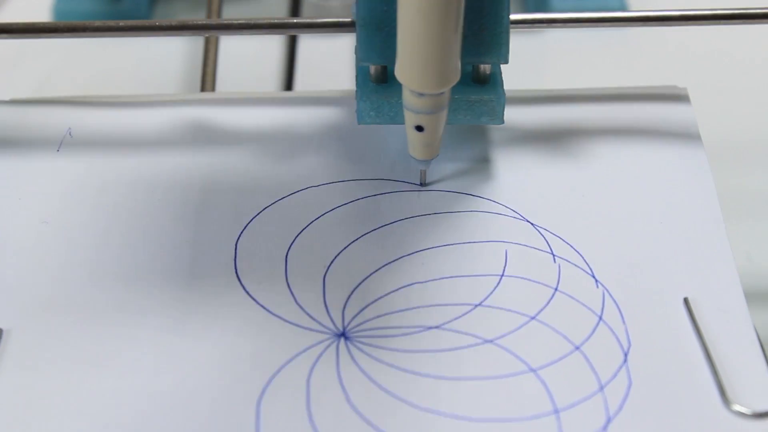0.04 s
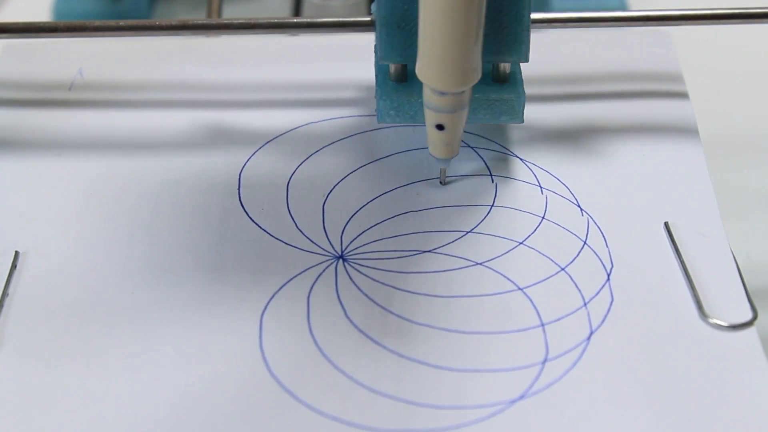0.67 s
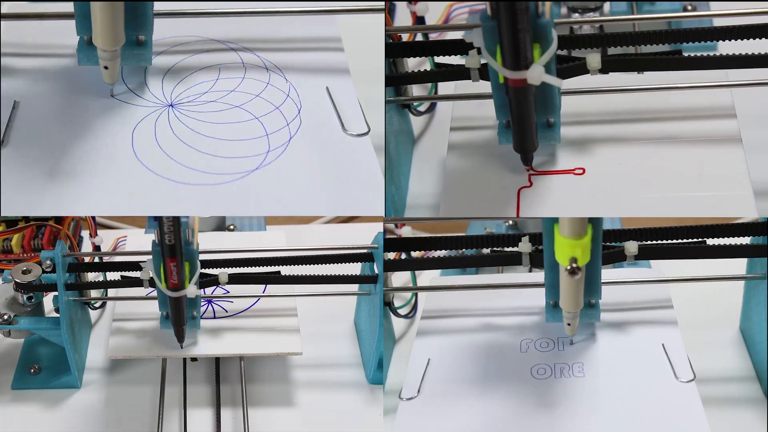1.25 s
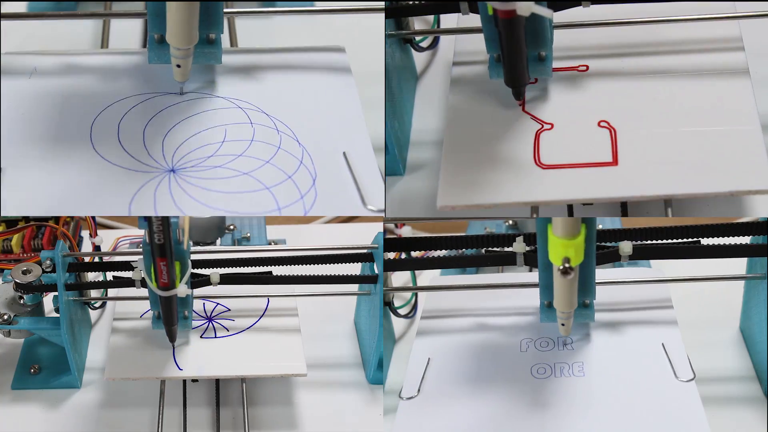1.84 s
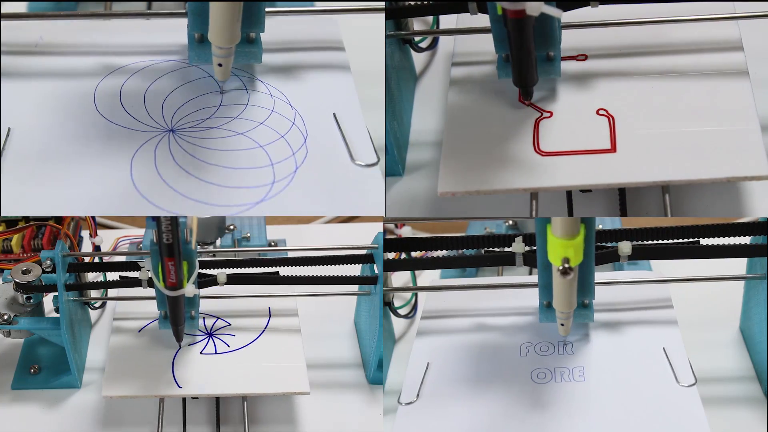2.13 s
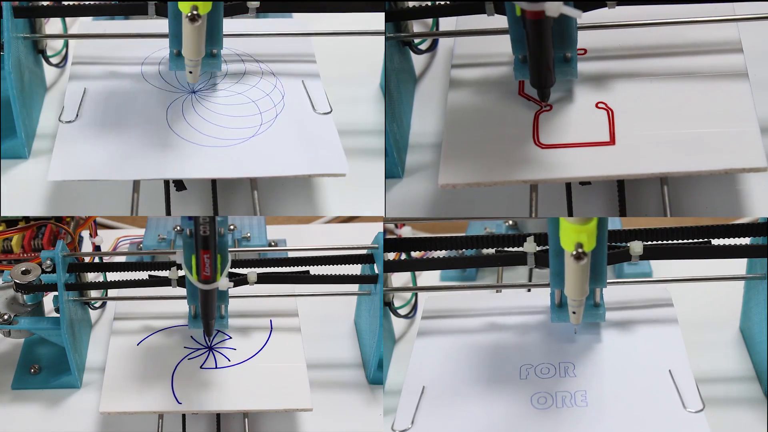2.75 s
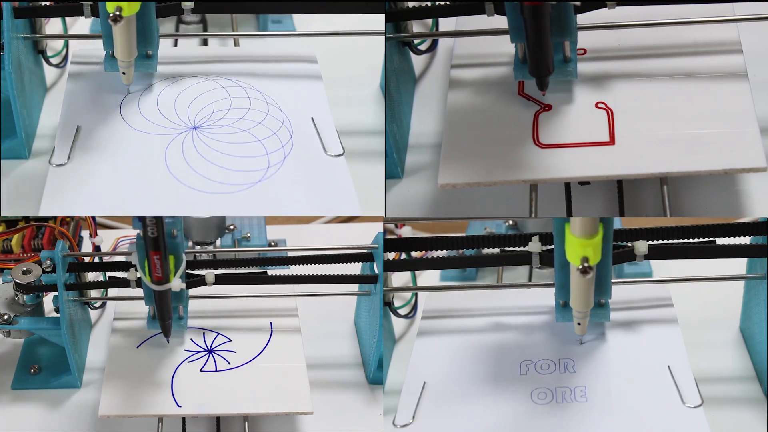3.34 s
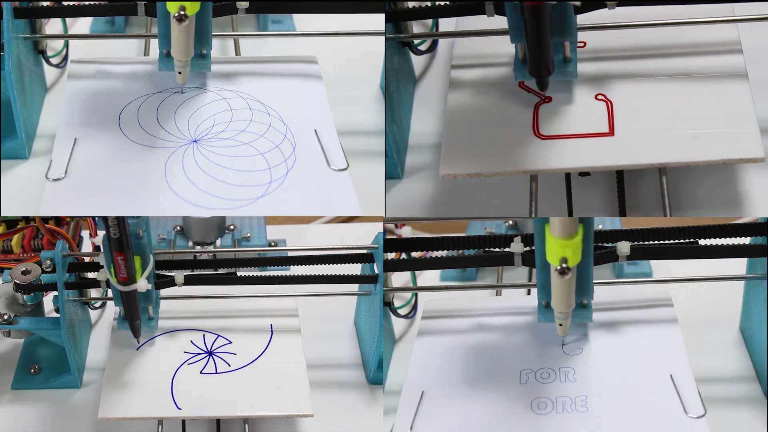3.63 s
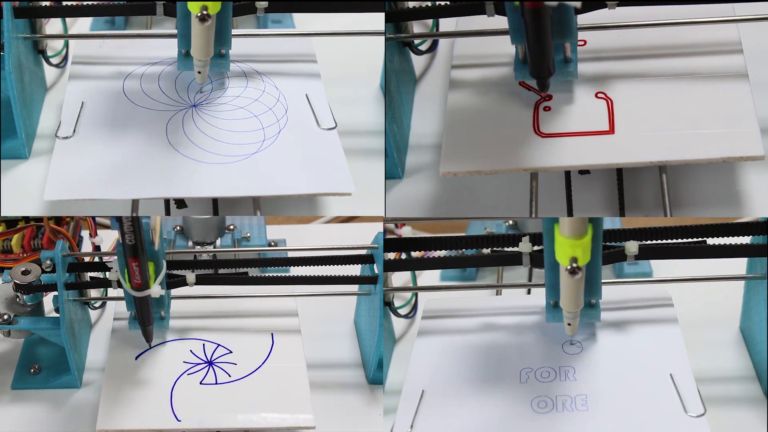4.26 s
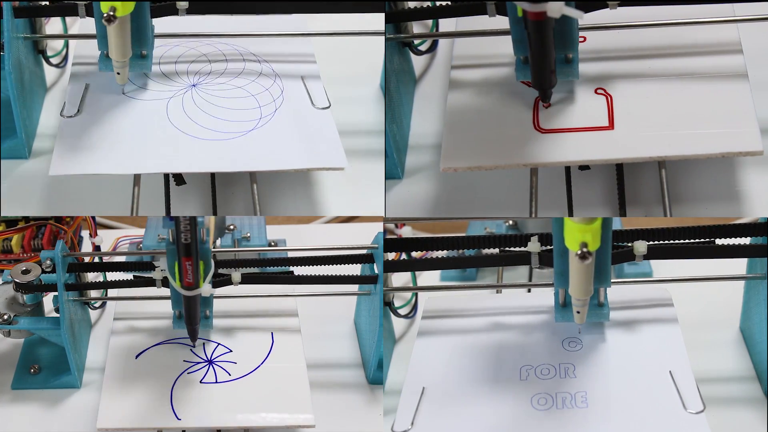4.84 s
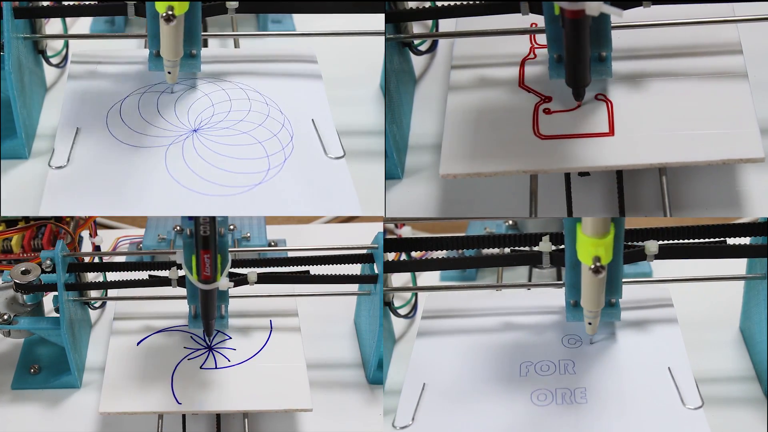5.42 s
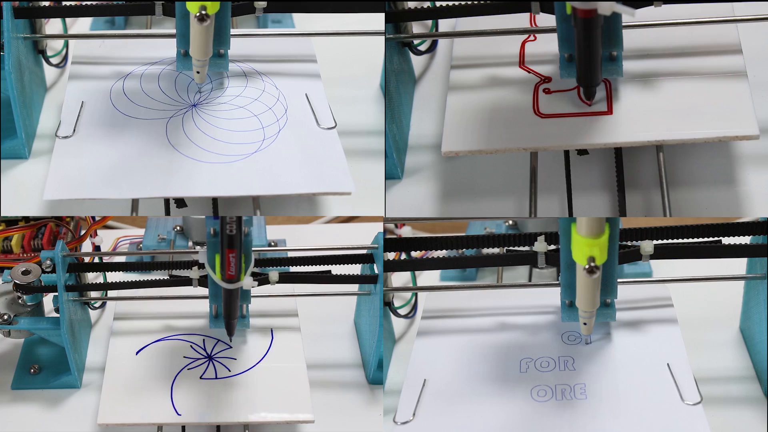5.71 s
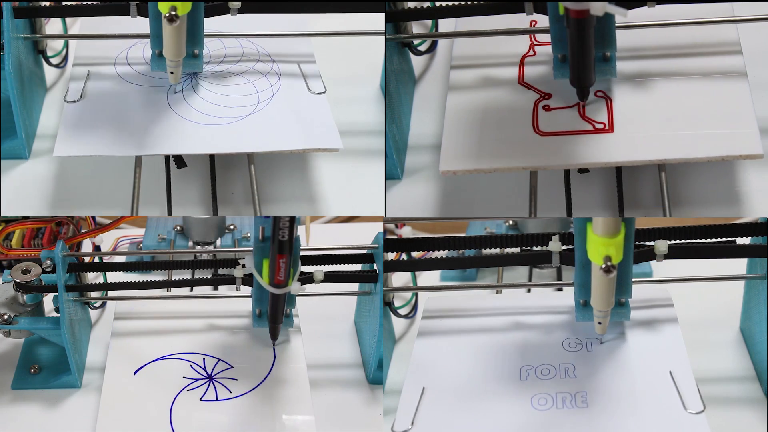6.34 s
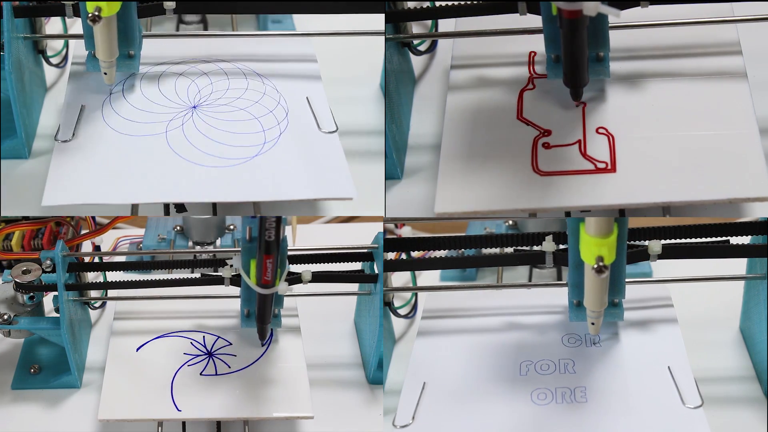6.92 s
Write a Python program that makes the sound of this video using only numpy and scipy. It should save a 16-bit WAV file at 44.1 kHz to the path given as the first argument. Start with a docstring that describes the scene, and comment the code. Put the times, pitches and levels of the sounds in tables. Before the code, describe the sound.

A small pen plotter's stepper motors whine close by, the pitch sweeping smoothly up and down over a soft rubbing hiss. After about a second, three more plotters join in with short, stuttering whines, and the sound grows busier. Loose bearings chatter and rasp on metal rods throughout, with scattered ticks and a few light knocks from pen lifts. The machines stand on a desk in a small room.

```python
"""A desk, close up: four small pen plotters. One draws a rosette of circles; after a second three
writers join it in short strokes. Steppers whine through the frames at multiples of the step rate,
rising and falling with axis speed. Loose bearings chatter and rasp on the rods, slides and pens rub,
the drives hum, and a pen lift knocks now and then."""
import sys
import numpy as np
from scipy import signal
from scipy.fft import rfft, irfft, next_fast_len
from scipy.io import wavfile
from scipy.ndimage import uniform_filter1d

SR = 44100
rng = np.random.default_rng(int(sys.argv[2]) if len(sys.argv) > 2 else 0)


def master(y):
    """Save y as 16-bit WAV."""
    cut = np.clip(np.atleast_2d(y).T, -1, 1)
    pcm = np.round(cut * 32767)  # scale
    wavfile.write(sys.argv[1], SR, pcm.astype(np.int16))


N = 307818
T = np.arange(N) / SR

TURN_S, DRAW_FROM_S, DRAW_TO_S = 1.355, -.724, .715  # from, to: relative to mid-circle
DRAW_STEP_HZ, SMOOTH_STEP_HZ = 519.5, 480
CIRCLER_RAMP_HZ_PER_S, WRITER_RAMP_HZ_PER_S = 6000, 4600
JOIN_S = .982  # writers start

# Table levels are relative. Order = multiple of the step rate.
# Circle midpoints: t/s
CIRCLES = [-0.279, 1.530, 3.326, 5.117, 6.917]
# Pen hops between circles: t/s from next midpoint, duration/s, peak step rate/Hz, level/dB
HOPS = [(-.98, .035, 490, -5), (-.957, .02, 490, -4), (-.9, .03, 490, -4), (-.86, .024, 490, 2),
        (-.834, .036, 480, -1)]
# Circler whine per axis, and its squeal: order, level/dB
BED_ORDERS = [(1, -13), (2, -13), (4, .3), (8, -2), (16, -.7)]
CARRIAGE_ORDERS = [(1, -11), (2, -12), (4, -11), (8, -7), (16, -12)]
SQUEAL_ORDERS = [(20, 0), (24, -5), (28, -3), (32, -6)]
# High resonances of the circler frame and the steel rods: f/Hz, width/Hz, level/dB
SQUEAL_MODES = [(8330, 1000, 0), (12300, 1500, -4.5)]
ROD_MODES = [(4200, 420, -2), (8350, 600, -8.5), (12100, 1000, -11)]
# Frame radiation: f/Hz, level/dB
CIRCLER_FRAME = [(150, -50), (330, -33), (450, -16), (560, -14), (680, -24), (1000, -19), (1330, -17),
                 (1550, -8), (1850, -1.5), (2050, 1), (2600, -2), (3050, -15), (3600, -17), (4200, -9),
                 (4900, -18), (6600, -16), (7500, -4), (8300, 3.5), (9300, -10), (11000, -19)]
WRITER_FRAME = [(100, -40), (230, -9), (320, -16), (520, -9), (700, -6), (890, 2.5), (1010, .5),
                (1300, -3.5), (2000, 1), (3000, -4), (4150, 5), (5200, -6), (8300, 0), (13000, -9)]
# Slide and pen friction spectra: f/Hz, level/dB
CIRCLER_RUB = [(30, -44), (150, -38), (310, -34), (450, -18), (540, -17), (620, -21), (1000, -12),
               (1550, -3), (1850, 2), (2200, -2), (3500, -4), (4300, 0), (6000, -7), (16000, -12)]
WRITER_RUB = [(30, -38), (100, -33), (170, -29), (205, -12), (255, -6.5), (320, -16), (540, -5.5),
              (740, -4), (900, 2), (1150, -2), (2200, 0), (3100, -4.5), (6000, -5), (15500, -12)]
# Drive hum: f/Hz, circler level/dB, writer level/dB
HUM = [(500.3, -79, -64), (1000, -64, -74), (2000, -72, -80)]
# Circler sleeve rattles, every lap: peak t/s from midpoint, swell/s, level/dB
LAP_RATTLES = [(-.811, .012, -45), (-.678, .012, -43), (-.546, .06, -47), (-.422, .04, -40),
               (-.225, .03, -44), (.245, .055, -42), (.428, .003, -42), (.452, .02, -42), (.62, .02, -47),
               (.68, .015, -38), (.726, .004, -46)]
# Hard rattles, mostly the writers', a few (2.43 s, 6.03 s) from the circler's bearings: peak t/s, swell/s,
# sleeve level/dB, rod level/dB
HARD_RATTLES = [(1.172, .008, -45, -48), (1.203, .012, -46, -46), (1.255, .009, -42, -44),
                (1.306, .031, -42, -41), (1.414, .025, -46, -46), (1.513, .014, -39, -35.5),
                (1.879, .026, -42, -38), (1.99, .05, -42, -38), (2.145, .004, -39, -39),
                (2.28, .035, -47, -46), (2.432, .012, -41, -52), (2.585, .017, -43, -47),
                (2.833, .006, -34.5, -44), (2.93, .014, -41, -42), (3.14, .015, -41, -50),
                (3.27, .015, -41, -50), (3.482, .03, -42, -45), (3.805, .02, -41, -39),
                (3.998, .035, -39, -39), (4.263, .014, -39, -46), (4.313, .028, -46, -41),
                (4.475, .056, -43, -46), (4.575, .06, -45, -44), (4.663, .019, -45, -41),
                (5.042, .018, -41, -45), (5.16, .02, -46, -48), (5.597, .03, -46, -42),
                (5.939, .003, -43, -42), (6.026, .004, -44, -50), (6.066, .012, -40, -50),
                (6.114, .03, -42, -42), (6.484, .028, -42, -40), (6.686, .02, -39, -38),
                (6.775, .03, -42, -51)]
# Belt and bearing slack ticks: t/s, level/dB
TICKS = [(.1456, -31), (.718, -36), (1.857, -29), (1.9235, -31), (2.1425, -25), (2.828, -23.5),
         (3.3608, -23.5), (3.8028, -28), (5.418, -23), (5.4903, -26), (6.2362, -30)]
# Response of struck sleeves and rods: f/Hz, level/dB
CIRCLER_SLEEVE = [(300, -35), (2000, -15), (4200, -10), (6500, -11), (8300, 6), (9100, 0), (10200, -8),
                  (11700, 0), (12900, 0), (13800, -14), (16000, -17)]
WRITER_SLEEVE = [(300, -35), (1000, -13), (2000, -14), (3000, -12), (5000, -11), (6000, -6), (7000, -9),
                 (8300, 4.5), (9100, -2), (10200, -9), (12100, -.5), (13000, -3), (14000, -5), (16000, -9)]
ROD_RESPONSE = [(300, -35), (1000, -12), (3000, -9), (3600, -2), (4150, 9), (4900, -5), (6000, 2.5),
                (7000, -10), (8600, 2), (10300, -11), (12600, -4), (14600, 6.5), (16000, -9)]
# Writer whine, and the overtone that rings the rods: order, level/dB
WRITER_ORDERS = [(1, -9), (2, 0), (4, -10), (16, -15)]
ROD_ORDER = [(8, -1)]
# Curved strokes: mid t/s, duration/s, peak step rate/Hz, level/dB
STROKES = [(1.06, .06, 490, 2), (1.225, .16, 490, 2), (1.29, .1, 590, -2), (1.454, .19, 650, 0),
           (1.47, .16, 490, -3), (1.655, .2, 530, -4), (1.82, .16, 520, -2), (1.833, .16, 650, 1),
           (1.95, .14, 590, -1), (2.53, .08, 500, 0), (2.62, .15, 580, -2), (2.68, .19, 510, 1.5),
           (2.73, .2, 510, -3), (2.81, .11, 520, -3), (3.48, .08, 500, -1), (3.565, .1, 500, -2),
           (3.68, .3, 522, -1.5), (3.885, .09, 450, -1), (4.12, .05, 500, 2), (4.16, .06, 500, 2.5),
           (4.442, .18, 459, 0), (5.506, .14, 470, 2.5), (5.75, .1, 480, -1), (5.992, .24, 522, -1),
           (6.4, .15, 505, 1.5)]
# Lines: start t/s, stop t/s, max step rate/Hz, run-up level/dB, braking level/dB, 4th-order boost/dB
LINES = [(1.14, 1.39, 640, -9, -2, 0), (2.95, 3.14, 260, 5, 8, -4), (3.34, 3.585, 600, -9, -1, -3),
         (3.43, 3.67, 530, -16, -5, 14), (3.78, 4.085, 700, -9, 0, 0), (4.48, 4.775, 680, -14, -7, 16),
         (4.785, 5.13, 660, -5, -3, 13), (5.22, 5.448, 520, -18, -7, 20), (5.32, 5.695, 800, -3, -7, -6),
         (5.465, 5.79, 650, -10, -10, 11), (5.785, 6.195, 930, -6, -5, -6), (6.31, 6.575, 620, -12, -2, 8),
         (6.485, 6.775, 620, -4, -3, 7)]
# Bearing drag: mid t/s, duration/s, level/dB
RASPS = [(1.2, .09, -44), (1.42, .07, -42), (1.81, .06, -45), (2.54, .12, -46), (2.68, .16, -46),
         (3.11, .06, -47), (3.46, .12, -47), (3.58, .07, -44), (4.38, .06, -47), (4.51, .14, -46),
         (5.03, .07, -46), (5.16, .07, -43), (5.52, .22, -47.5), (5.91, .06, -46), (6.04, .04, -44),
         (6.61, .14, -45)]
# Pen-lift and frame knocks: t/s, f/Hz, level/dB, decay/s
KNOCKS = [(2.875, 1900, -41, .02), (2.894, 1900, -40, .014), (2.935, 2800, -38, .006),
          (3.375, 480, -52, .022), (4.657, 680, -47, .012), (6.308, 250, -48, .02),
          (6.738, 950, -38.5, .012), (6.728, 650, -44, .018), (6.781, 480, -44, .009),
          (6.827, 560, -44, .01)]
# Side-channel response of the room scatter: f/Hz, level/dB
SIDE_RESPONSE = [(60, 7), (170, 3), (330, 2), (700, -6), (1400, -9), (3000, -11), (10000, -12),
                 (15000, -10)]


def undb(db):
    """dB to gain."""
    return 10 ** (np.asarray(db) / 20)


def unit(x):
    """Scale to rms 1."""
    return x / np.sqrt(np.mean(x ** 2) + 1e-20)


def colour(x, points):
    """Minimum-phase filter through points of f/Hz, level/dB."""
    size = next_fast_len(N + 8192, real=True) // 2 * 2
    hz, db = np.transpose(points)
    bins_hz = np.arange(size // 2 + 1) * SR / size
    gain = undb(np.interp(np.log(bins_hz + 1), np.log(hz), db))
    cepstrum = irfft(np.log(gain))
    cepstrum[1:size // 2] *= 2
    cepstrum[size // 2 + 1:] = 0
    return irfft(rfft(x, size) * np.exp(rfft(cepstrum)))[:N]


def ring(x, hz, width_hz, stages=1):
    """Cascade of equal resonators, gain 1 at centre."""
    for _ in range(stages):
        x = signal.lfilter(*signal.iirpeak(hz, hz / width_hz, fs=SR), x)
    return x


def decay(x, decay_s):
    """Exponential tail on each impulse."""
    return signal.lfilter([1], [1, -np.exp(-1 / (decay_s * SR))], x)


def walk(rate_hz):
    """Smooth random drift, spread near 1."""
    hop = max(int(SR / rate_hz), 1)
    points = 1.15 * rng.standard_normal(N // hop + 2)
    ease = .5 - .5 * np.cos(np.pi * np.arange(hop) / hop)
    return (points[:-1, None] + np.diff(points)[:, None] * ease).ravel()[:N]


def lap():
    """Time from the nearest circle midpoint, and pen speed as a step rate: ramp, hold, brake."""
    since_s = T - np.array(CIRCLES)[np.argmin(abs(T[:, None] - CIRCLES), axis=1)]
    edge_s = np.minimum(since_s - DRAW_FROM_S, DRAW_TO_S - since_s)
    return since_s, np.clip(edge_s * CIRCLER_RAMP_HZ_PER_S, 0, DRAW_STEP_HZ)


def moves(rows):
    """Step rate and gain of an axis: one arch of speed per move."""
    step_hz, gain = np.zeros((2, N))
    for mid_s, length_s, peak_hz, db in rows:
        i = np.arange(max(int((mid_s - length_s / 2) * SR), 0), min(int((mid_s + length_s / 2) * SR), N))
        arch = np.maximum(np.cos(np.pi * (T[i] - mid_s) / length_s), 0)
        step_hz[i], gain[i] = peak_hz * arch, undb(db) * np.sqrt(arch)
    return step_hz, gain


def stepper(step_hz, orders, jitter, flutter):
    """Rotor snaps pole to pole; speed jitters, overtones flutter with load. Near silent when slow."""
    steps = np.cumsum(step_hz * (1 + jitter * walk(250))) / SR
    phase = 2 * np.pi * (steps % 1)
    whine = sum(undb(db) * (1 + flutter * walk(70)) * np.sin(order * phase) for order, db in orders)
    return whine * np.minimum(step_hz / 320, 1) ** 1.5


def circling_motors():
    """Bed and carriage run at the cosine and sine of the heading; the pen hops between circles."""
    since_s, feed_hz = lap()
    heading = 2 * np.pi * since_s / TURN_S
    bed_hz, carriage_hz = feed_hz * abs(np.cos(heading)), feed_hz * abs(np.sin(heading))
    bed = stepper(bed_hz, BED_ORDERS, jitter=.003, flutter=.17)
    # the belt carries more whine pulling than pushing
    bed -= .2 * np.cos(heading) * ring(bed, 2100, 1900)
    carriage = stepper(carriage_hz, CARRIAGE_ORDERS, jitter=.008, flutter=.35)
    hop_hz, gain = moves([(mid_s + offset_s, *hop) for mid_s in CIRCLES for offset_s, *hop in HOPS])
    hops = gain * stepper(hop_hz, BED_ORDERS[:4], jitter=.04, flutter=.4)
    whine = undb(-44.5) * colour(bed + carriage + hops, CIRCLER_FRAME)
    return whine + undb(-44.5) * squeal(bed_hz) + undb(-55) * squeal(carriage_hz)


def squeal(step_hz):
    """Below cruising speed the rotor shudders; its upper orders sweep the high frame modes."""
    shudder = np.clip((SMOOTH_STEP_HZ - step_hz) / 55, 0, 1)
    upper = shudder * stepper(step_hz, SQUEAL_ORDERS, jitter=.011, flutter=.45)
    return sum(undb(db) * ring(upper, hz, width_hz, stages=2) for hz, width_hz, db in SQUEAL_MODES)


def impacts(rate_hz, scatter_db, decay_s, unevenness, contact_samples=14):
    """A loose part strikes near-periodically, each strike a gritty crack."""
    chance = rng.standard_normal((int(8 * rate_hz), 2))
    periods_s = np.exp(unevenness * chance[:, 0]) / rate_hz
    onsets = (np.cumsum(periods_s) * SR).astype(int)
    hits = np.bincount(onsets, undb(scatter_db * chance[:, 1]), N)[:N]
    envelope = decay(uniform_filter1d(hits, size=contact_samples), decay_s)
    return unit(envelope * rng.standard_normal(N))


def rubbing(joined):
    """Rolling balls and pen tips make grit that rings the rods; the writer frames growl."""
    _, feed_hz = lap()
    load = undb(-6.5 + 1.2 * feed_hz / DRAW_STEP_HZ + 5.5 * joined + 1.3 * walk(30))
    circler = unit(colour(rng.standard_normal(N) * undb(walk(20)), CIRCLER_RUB))
    grains = impacts(rate_hz=900, scatter_db=3, decay_s=.0006, unevenness=.3)
    grit = unit(grains + .9 * rng.standard_normal(N))
    rods = unit(sum(undb(db + 2.2 * walk(45)) * ring(grit, hz, 1.5 * width_hz, stages=2)
                    for hz, width_hz, db in ROD_MODES))
    roughness = impacts(rate_hz=1100, scatter_db=2.5, decay_s=.001, unevenness=.3)
    growl = unit(colour(roughness, WRITER_RUB))
    return undb(-46.5) * circler + load * (undb(-49) * rods + undb(-44) * joined * growl)


def hum(joined):
    """Pulsed drive current sings at steady pitches."""
    out = np.zeros(N)
    for hz, circler_db, writer_db in HUM:
        gain = undb(circler_db) + joined * undb(writer_db + 2 * walk(12))
        wobble_rad = (.25 + .15 * joined) * walk(14)
        out += gain * np.sin(2 * np.pi * hz * T + wobble_rad)
    return out


def bursts(rows, release_s=.008):
    """Rattle force: soft onset, swell, abrupt end."""
    force = np.zeros(N)
    for peak_s, swell_s, db in rows:
        corners_s = peak_s + np.array([-swell_s - .002, -swell_s, 0, release_s, release_s + .004])
        i = slice(*np.searchsorted(T, corners_s[[0, -1]]))
        force[i] += undb(db + np.interp(T[i], corners_s, [-25, -11, 0, -11, -35]))
    return force


def chatter(joined, faint_per_s=9):
    """Bearing sleeves sizzle and buzz in bursts; hard rattles hammer the rods; ticks ring both."""
    sizzle = lap()[1] / DRAW_STEP_HZ * undb(-62 + 4 * walk(40))
    lap_force = sizzle + bursts([(mid_s + offset_s, swell_s, db)
                                 for mid_s in CIRCLES for offset_s, swell_s, db in LAP_RATTLES])
    faint_force = joined * bursts([((k + late) / faint_per_s, .016, -53 + 3 * strength)
                                   for k, (late, strength) in enumerate(rng.random((80, 2)))])
    sleeve_force = bursts([(peak_s, swell_s, db) for peak_s, swell_s, db, _ in HARD_RATTLES])
    rod_force = bursts([(peak_s, swell_s, db) for peak_s, swell_s, _, db in HARD_RATTLES])
    rod_force = np.hypot(undb(-1.5) * faint_force, rod_force)
    ticks = slack_ticks()
    buzz = impacts(rate_hz=640, scatter_db=2, decay_s=.0008, unevenness=.25)
    hammer = impacts(rate_hz=430, scatter_db=1.2, decay_s=.00025, unevenness=.08, contact_samples=32)
    rattle = faint_force * buzz + .6 * sleeve_force * (buzz + hammer)
    sleeves = colour(undb(8.3) * rattle + undb(-3) * ticks, WRITER_SLEEVE)
    rods = colour(undb(8.6) * rod_force * hammer + undb(1.5) * ticks, ROD_RESPONSE)
    return sleeves + rods + colour(undb(8) * lap_force * buzz, CIRCLER_SLEEVE)


def slack_ticks():
    """Slack in belts and bearings gives lone ticks."""
    hits = np.zeros(N)
    for at_s, db in TICKS:
        hits[int(at_s * SR)] = undb(db)
    return decay(hits + 1e-18, decay_s=.0013) * rng.standard_normal(N)


def writing_motors(count=3):
    """Steppers whine through the frames: lines and curved strokes over a stutter of random moves."""
    out = straight_lines(count)
    for axis in range(count):
        step_hz, gain = moves(STROKES[axis::count])
        rod = ring(stepper(step_hz, ROD_ORDER, jitter=.005, flutter=.3), 4170, 220)
        whine = stepper(step_hz, WRITER_ORDERS, jitter=.02, flutter=.45)
        out += undb(-45.5) * gain * (whine + rod)
        length_s, peak_hz, db = rng.uniform([.05, 370, -5], [.18, 590, 0], (240, 3)).T
        step_hz, gain = moves(zip(np.cumsum(length_s) - length_s / 2, length_s, peak_hz, db))
        stutter = stepper(step_hz, [(2, 0), (4, -2), (8, -6)], jitter=.012, flutter=.35)
        out += undb(-51.5) * gain * stutter
    return colour(out, WRITER_FRAME)


def straight_lines(count):
    """A stepper ramps, cruises and brakes; some lines ring the frame an octave higher."""
    out = np.zeros(N)
    for axis in range(count):
        step_hz, gain, upper_db = np.zeros((3, N))
        for start_s, stop_s, max_hz, run_up_db, brake_db, boost_db in LINES[axis::count]:
            i = slice(int(start_s * SR), int(stop_s * SR))
            edge_s = np.minimum(T[i] - start_s, stop_s - T[i])
            step_hz[i] = np.clip(edge_s * WRITER_RAMP_HZ_PER_S, 0, max_hz)
            fade_s = start_s + (stop_s - start_s) * np.array([.4, .6])
            gain[i] = undb(np.interp(T[i], fade_s, [run_up_db, brake_db]))
            # the frame favours the 4th order near 2 kHz
            upper_db[i] = boost_db + 1.5 - abs(step_hz[i] - 490) / 16
        out += gain * stepper(step_hz, [(2, 0), (4, upper_db - 9), (8, -14)], jitter=.016, flutter=.45)
    return undb(-48) * out


def rasps():
    """A dragging bearing scrapes its rod, ringing two close modes."""
    drag = sum(undb(db) * np.sqrt(np.maximum(1 - (2 * (T - mid_s) / length_s) ** 2, 0))
               for mid_s, length_s, db in RASPS)
    scrape = drag * impacts(rate_hz=480, scatter_db=3, decay_s=.0008, unevenness=.2)
    return undb(13) * sum(undb(2 * walk(25)) * ring(scrape, hz, 280, stages=2) for hz in (4040, 4210))


def knocks():
    """Pen lifts and frames: dull blows into damped plastic."""
    out = np.zeros(N)
    for at_s, hz, db, decay_s in KNOCKS:
        i = int(at_s * SR)
        age_s = T[:min(N - i, SR // 4)]
        body = unit(ring(rng.standard_normal(len(age_s)), hz, .5 * hz, stages=2))
        envelope = np.exp(-age_s / decay_s) * (1 - np.exp(-age_s / .001))
        out[i:i + len(age_s)] += undb(db + 3) * body * envelope
    return out


def scene():
    """Plotters just right of centre; desk and wall scatter, widest in the bass."""
    joined = np.clip((T - JOIN_S) / .005, 0, 1)
    direct = circling_motors() + rubbing(joined) + hum(joined) + chatter(joined)
    direct += joined * writing_motors() + rasps() + knocks()
    age_s = T[:SR // 3]
    scatter = rng.standard_normal((2, len(age_s))) * np.exp(-age_s / .035) * (age_s > .001)
    scatter /= np.sqrt(np.sum(scatter ** 2, axis=1, keepdims=True))
    near, wide = (signal.fftconvolve(direct, response)[:N] for response in scatter)
    mid = direct + undb(-15) * near
    side = undb(-1) * colour(wide, SIDE_RESPONSE)
    return np.array([undb(-.8) * mid + side, undb(.8) * mid - side])


def record(dry):
    """Steep low-pass at 15.85 kHz."""
    return signal.sosfilt(signal.ellip(12, .2, 70, 15850, fs=SR, output="sos"), dry)


dry = scene()
out = record(dry)
master(out)
```